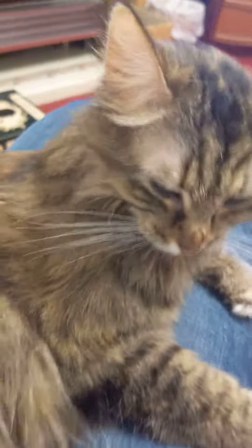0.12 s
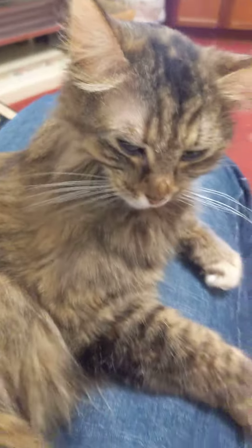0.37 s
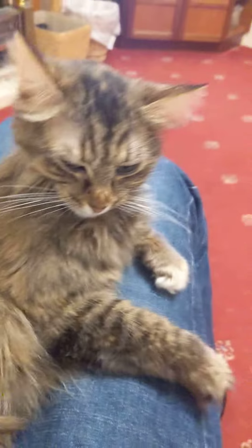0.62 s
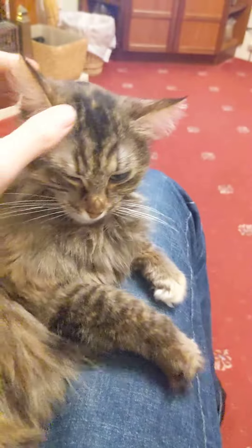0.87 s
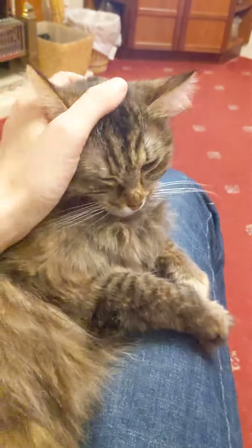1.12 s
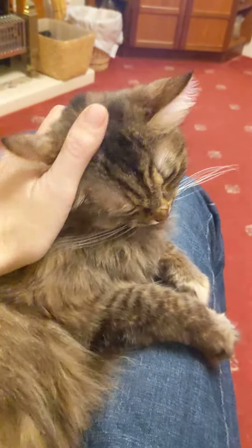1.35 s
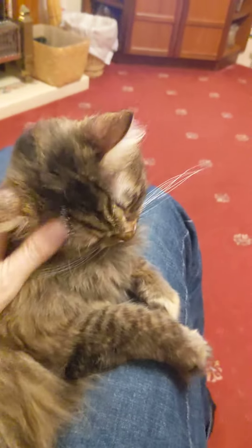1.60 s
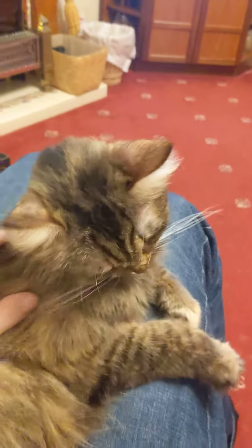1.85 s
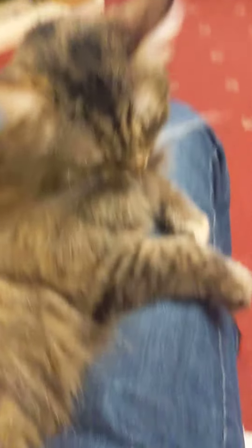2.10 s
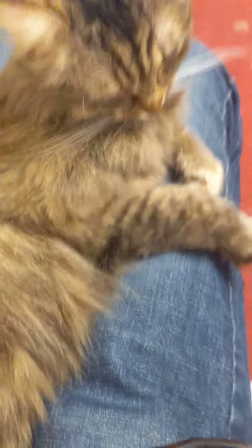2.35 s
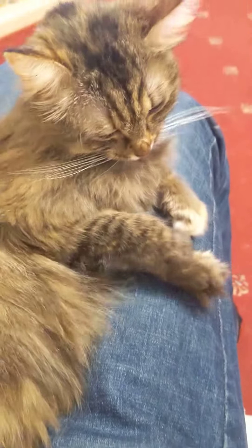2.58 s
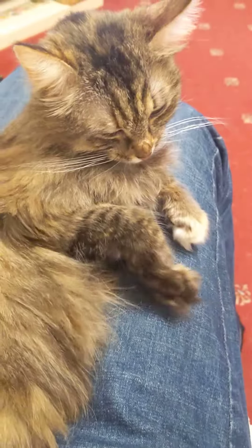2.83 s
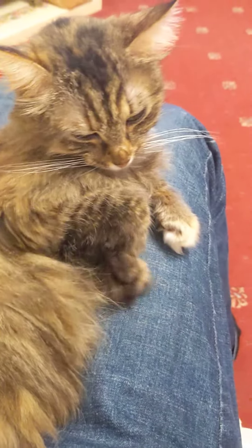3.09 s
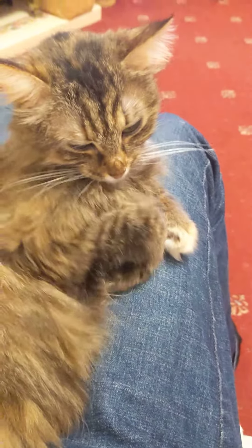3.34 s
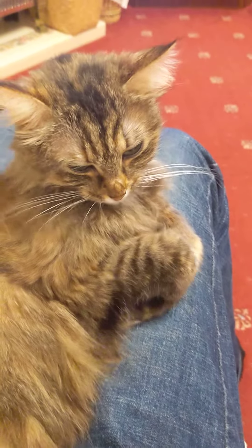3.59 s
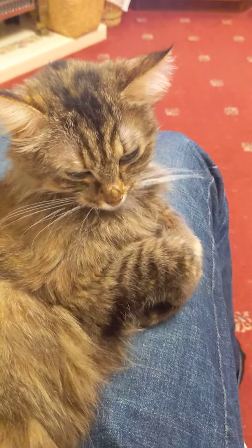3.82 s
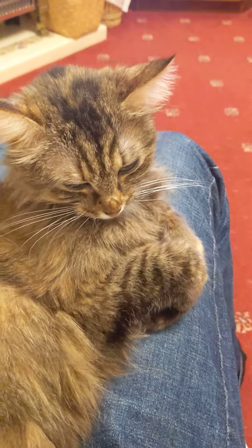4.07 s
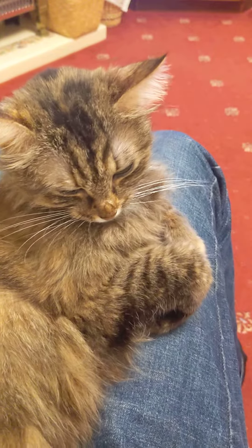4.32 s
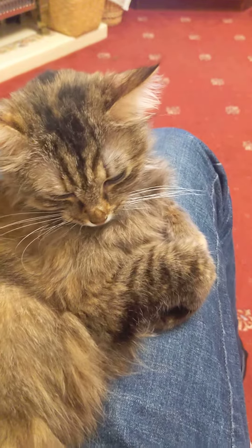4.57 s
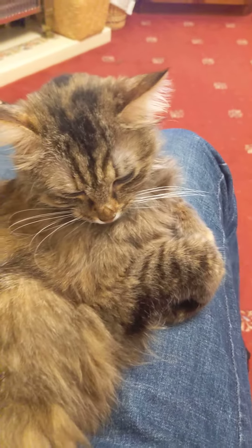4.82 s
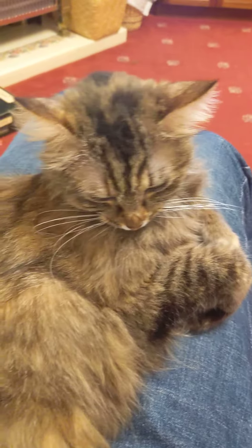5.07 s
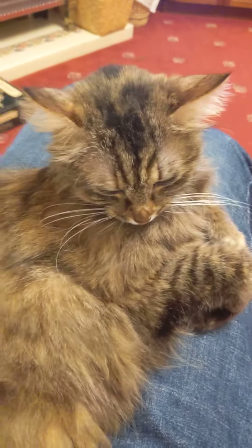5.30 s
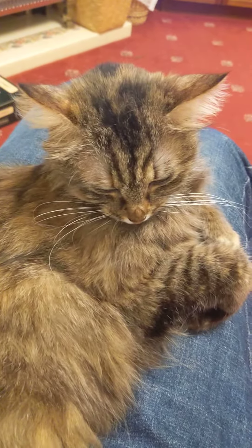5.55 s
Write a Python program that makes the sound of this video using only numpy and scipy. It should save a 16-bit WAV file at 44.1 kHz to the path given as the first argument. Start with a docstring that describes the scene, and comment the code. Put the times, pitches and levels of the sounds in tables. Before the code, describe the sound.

A low fluttering purr pulses quickly, swelling and sagging breath by breath. Around it are dry little grip ticks, soft fabric slides and an airy finger brush on the microphone at about three and a half seconds. A crisp click interrupts at two seconds; a deep, cluttered knock on the case ends the otherwise quiet, close stereo indoor scene.

```python
"""Cat purring on a lap

A cat purrs in a quiet carpeted room, an arm's length from a hand-held phone with two microphone ports.
Larynx twitches excite chest and throat resonances; skin, fur and cloth slide as noise of dense fibre slips.
The grip ticks, taps and knocks the case, once hard near the end, as noise cracks and decaying modes;
room rumble and microphone hiss, made of coloured noise, lie underneath."""
import sys
import numpy as np
from scipy import signal
from scipy.fft import rfft, irfft
from scipy.io import wavfile
from scipy.ndimage import uniform_filter1d

SR = 44100
rng = np.random.default_rng(int(sys.argv[2]) if len(sys.argv) > 2 else 0)


def bounce(signal):
    """Save signal as a 16-bit WAV file at the path given by the first command-line argument."""
    frames = np.transpose(np.atleast_2d(signal))
    limited = np.clip(frames, -1, 1)
    pcm = np.round(limited * 32767).astype(np.int16)
    wavfile.write(sys.argv[1], SR, pcm)


def gain_from_db(level_db):
    """Convert decibel levels to linear amplitude factors (20 dB per decade)."""
    decades = np.asarray(level_db, float) / 20
    return 10 ** decades


N = 250488
T = np.arange(N) / SR
SIDES = np.array([[.5], [-.5]])  # shares out a left-minus-right difference in dB

# the purr rides on each breath, out and in by turns:
# (start [s], length [s], level before the sag [dB], throat opening [dB], twitch rate [1/s])
BREATHS = [(.0, .84, -43.5,  -4, 29.036), (1.1, 1.07, -66.5, 1, 28.12), (2.1, 1.05, -55, -7, 29.6),
           (3.28, 0.9107, -62, -2.5, 27.012), (4.15, 0.95, -54.5, -6, 29.4), (5.199, .7, -64, -8, 27.72)]
SWELL_S, FADE_S, SAG_DB_PER_S, BETWEEN_DB, WAVER_DB = .2, .25, 5.5, -78.5, 2.5
FIRST_TWITCH = .51  # share of a cycle already gone at the start

# chest resonance: (frequency [Hz], width [Hz], gain [dB])
CHEST_MODES = [(190, 58, 1.5)]
# throat resonances: (frequency [Hz], width [Hz], gain [dB])
THROAT_MODES = [(269.29, 45, -5), (330.13, 93.97, -1), (430, 50, -13), (740, 110, -8), (1350, 589.3, -18)]
SNAP_S, SNAP_SCATTER_DB = .0015, 2.8
CLOSE_SHARE, CLOSE_DB = .5, -11.  # the folds clap shut later in the cycle, more softly
FLUTTER_DB, FLUTTER_RISE = -9, .15  # level of the puffs; dB gained per dB of lost effort
GARGLE_DB = -15  # uneven air bursts in the throat
RATTLE_HZ, RATTLE_DB = 3250, -22.  # nose rattle, against the throat
# wet crackle at the twitches, stronger on some
CRACKLE_HZ, CRACKLE_WIDTH_HZ, CRACKLE_DB, CRACKLE_SCATTER_DB = 1000, 1300, -22, 3
PURR_LOW_HZ = 110  # a small body radiates no deep bass
PORT_LAG_S, PURR_ROOM_DB, PURR_PAN_DB = .00033, -8., 4  # pan: left minus right

# fur and cloth slide by the left port: (start [s], fullest [s], end [s], dull centre [Hz],
# dull part [dB], bright part [dB])
SLIDES = [(-.05, 0.14, 0.27915, 2000, -70, -73), (0.7, 0.725, 0.74557, 2200, -67.5, -68),
          (1.18, 1.29, 1.42, 2100, -66.5, -78), (1.42, 1.448, 1.465, 2200, -61, -71),
          (1.54, 1.6, 1.66, 1900, -64, -72), (1.6, 1.68, 1.8045, 1700, -71, -69),
          (2.195, 2.348, 2.6612, 1700, -75.5, -72.5), (2.888, 3.0, 3.175, 1500, -63.5, -63),
          (3.283, 3.323, 3.4378, 1800, -69.5, -74), (3.801, 3.883, 4.103, 1700, -77, -70),
          (4.38, 4.47, 4.77, 1500, -70, -67), (5.108, 5.207, 5.2405, 1500, -70.5, -74),
          (5.359, 5.363, 5.3885, 1700, -56, -52), (5.43, 5.46, 5.52, 1900, -66, -72.5)]
# a finger brushes the right port: (loudest [s], rise over 20 dB [s], fall over 20 dB [s],
# dull part [dB], bright part [dB])
BRUSHES = [(.2, 0.0511, 0.0009, -75, -65), (2.714, 0.05288, 0.2772, -64.5, -59.5),
           (3.47, 0.10515, 0.0269, -62, -53.5)]
# spectrum of the dull friction noise: (frequency [Hz], relative level [dB])
DULL_SPECTRUM = [(500, -24), (930, -17), (1100, -2), (1600, 0), (2200, -5), (3000, -11.5), (5000, -27.5)]
# spectrum of the bright friction noise: (frequency [Hz], relative level [dB])
BRIGHT_SPECTRUM = [(1500, -20.5), (3000, -2.5), (5200, 2), (6500, 0), (8200, -1.5), (11000, -4.5),
                   (15900, -13)]
# humps of the dull part, each of which comes and goes: (frequency [Hz])
DULL_HUMPS_HZ = (1200, 1650, 2300)
SLIDE_PAN_DB, BRUSH_PAN_DB, SLIDE_ROUNDNESS = 16.5, -7, 0.5
RUSTLE_DULL_DB, RUSTLE_BRIGHT_DB, RUSTLE_PAN_DB = -77.5, -78.5, 13  # faint steady rustle of clothes
HUMP_WANDER_DB, SCRATCH_DB = 2.2, 2.2  # scatter of the humps and of the scratchy grain
HUMP_LOSS_DB = 14  # loss of a hump one octave from a slide's centre

# ticks and scrapes on the case: (time [s], peak level [dB], centre frequency [Hz],
# left minus right [dB], decay constant [ms])
TICKS = [(.07, -46.5, 750, 8, 1.5), (0.087, -50, 3000, 16.5, 1.2), (.156, -39, 2200, 14, 0.6),
         (0.174, -39, 2300, 0, .6), (0.187, -39, 1900, 0, .7), (.346, -48, 900, 4, 2),
         (.427, -43, 1500, 0, .5), (.563, -45, 740, 5, 1.926), (.705, -50, 2166, 17, 1.4516),
         (1.272, -50, 480, 8, 3), (1.372, -53, 600, 8, 4), (1.441, -49, 3000, 22, 6),
         (1.568, -52, 1500, 14, 5), (1.594, -33, 680, 0.5, 6), (1.597, -36, 1450, 18, 5.5),
         (1.715, -46, 2500, 13, 1.5), (2.11, -52, 700, 4, 1.5), (2.065, -24, 1500, -8, 0.8),
         (2.0648, -21.5, 5400, -17, 0.45), (2.477, -53, 1100, 4, 1.5), (2.49, -53, 750, 4, 3),
         (2.607, -47, 766.4, 0.5, 2.341), (2.914, -49, 2500, -12, 2.854), (3.03, -55, 600, 3, 2),
         (3.369, -48, 1811, 0, 1.013), (3.556, -50, 600, 3.5, 1.536), (3.826, -52, 900, 2, 1.5),
         (3.928, -47, 1300, 1, 2.223), (4.285, -40, 5851, -9.5, 0.5965), (4.987, -45, 750, 11, 3),
         (5.059, -54, 1200, 10, 4), (5.059, -52, 5462, 19.5, 2), (5.161, -50, 7480, 20, 1.062),
         (5.195, -42, 6565, 26, 0.544), (5.318, -47, 5000, 16, 0.782), (5.334, -48, 5357, 23.5, 0.772),
         (5.363, -31.5, 898.1, 18.5, 6.935), (5.371, -30, 380, 0.5, 7.003), (5.405, -46, 1600, 10, 3),
         (5.449, -37, 2400, 13, 2), (5.457, -35.5, 1800, 20, 1.5)]
# spectrum of a tick's broadband edge: (frequency [Hz], relative level [dB])
EDGE_SPECTRUM = [(1000, -6), (3000, 0), (5200, -4), (6500, 5), (7800, -5), (13000, 0), (16500, -3)]
# edge level at 2 kHz and 1 ms; higher and shorter ticks are sharper
EDGE_DB, EDGE_DB_PER_OCTAVE, EDGE_DB_PER_DOUBLING = -13, 5, -9

# knocks on the case: (time [s], blow level [dB], push length [ms], left minus right [dB],
# favoured pitch [Hz])
KNOCKS = [(1.593, -44, 1.198, 19.5, 320.4), (2.08, -46, 5, 0, 70), (2.254, -47, 1.11, 7, 220.6),
          (3.349, -47, 1.693, 9.5, 148), (3.366, -45, 2.5, 8, 130), (3.568, -53, 2.614, -5, 80),
          (3.829, -50, 5.38, -2.5, 74.95), (4.25, -47, 3.663, 0, 110), (5.363, -19.5, 1.7421, 1.5, 183.1),
          (5.365, -6.5, 3.239, 6, 71.04), (5.369, -15, 1, 3, 420), (5.374, -22, 1.5, 4, 280),
          (5.3905, -8, 3, 0, 135), (5.434, -26, 4, -6, 100), (5.458, -27, 3, 0, 155),
          (5.4808, -27, 4, 4, 115), (5.44, -40, 1, 0, 440), (5.496, -30, 4, 8, 125)]
# modes of case and hand: (frequency [Hz], 60 dB decay time [s], left gain [dB], right gain [dB])
CASE_MODES = [(58.321, 0.17647, 1, -9.5), (80, 0.087, 5.5, -0.5), (94.12, 0.0488, -4, -20),
              (132, 0.12, -7, 4), (165, 0.07, -2.5, 1), (204.08, 0.03, 1, -3.5),
              (303.03, 0.06122, -7.5, 9.5), (445, 0.0516, -3, -2)]
# spectrum of the grip's shudder at the reference pitch: (frequency [Hz], relative level [dB])
SHUDDER_SPECTRUM = [(40, -6), (120, 18), (300, -7.5), (900, -18.5), (1500, -59)]
SPOT_DB = 36.  # loss of a mode one octave from the favoured pitch
OPPOSED_HZ = 280  # higher modes bend the case, so the ports move against each other
SHUDDER_DB, SHUDDER_T60_S = -27.5, 0.5  # decay time at the reference pitch and below
SHUDDER_SPOT_HZ = 110  # reference pitch

# springy taps whose pitch sags as the grip settles: (time [s], level [dB], first pitch [Hz],
# settled pitch [Hz], left minus right [dB])
TAPS = [(2.0652, -26.5, 280, 122, 5), (2.134, -46, 280, 140, 8), (4.986, -47, 330, 160, 6),
        (1.592, -44, 450, 250, 10), (3.927, -48, 450, 200, 3)]
TAP_RISE_S, TAP_SAG_S, TAP_T60_S = .004, .011, .1

# spectrum of room and microphone noise: (frequency [Hz], left port [dB], right port [dB])
FLOOR_SPECTRUM = [(25, -25, -22), (46.85, -5, -5), (121.67, 4.5, 0.5), (200.43, 5, -4), (330, -4, -9.5),
                  (600, -14, -10), (1300, -32.5, -17.5), (2500, -22, -17.5), (5000, -19, -21.5),
                  (7078, -22.5, -27.5), (9500, -24, -34), (12211, -23.5, -21), (15900, -26, -23)]
FLOOR_DB, SHARED_BASS_HZ = -62.5, 300.
# narrow hiss bands: (frequency [Hz], width [Hz], left level [dB], right level [dB])
HISS_BANDS = [(13824, 150, -91, -79), (14664, 150, -92, -80)]


def to_rms(x, db):
    """Normalisation: scale to an rms level."""
    return x * gain_from_db(db) / np.sqrt(np.mean(x ** 2))


def colour(x, points):
    """Linear filtering: multiply the spectrum by (frequency [Hz], level [dB]) points."""
    hz, db = np.transpose(points)
    f = np.maximum(np.fft.rfftfreq(x.shape[-1], 1 / SR), 1)
    gain = gain_from_db(np.interp(np.log(f), np.log(hz), db))
    return irfft(rfft(x) * gain, x.shape[-1])


def ring(x, hz, width):
    """Resonance: a second-order peak of gain 1 at its centre."""
    return signal.lfilter(*signal.iirpeak(hz, hz / width, fs=SR), x)


def walk(rate):
    """Slow fluctuation: random levels drawn rate times a second, joined by slopes; spread near 1."""
    k = int(SR / rate)
    steps = np.repeat(rng.standard_normal(N // k + 1), k)
    return uniform_filter1d(steps, k)[:N]


def purr():
    """Source and filter: fold snaps and puffs of air excite chest and throat; the room smears them."""
    db, open_db, rate = breathing()
    phase = FIRST_TWITCH + np.cumsum(rate) / SR
    at = np.flatnonzero(np.diff(np.floor(phase)))
    chance = rng.standard_normal((len(at), 5))

    # each twitch snaps the folds apart, and they clap shut with the opposite sign
    opening = at + (.002 * SR * chance[:, 0]).astype(int)
    closing = at + ((CLOSE_SHARE + .08 * chance[:, 2]) * SR / rate[at]).astype(int)
    snaps = np.zeros(N)
    snaps[np.clip(opening, 0, N - 1)] = -gain_from_db(SNAP_SCATTER_DB * chance[:, 1])
    snaps[np.clip(closing, 0, N - 1)] = gain_from_db(CLOSE_DB + SNAP_SCATTER_DB * chance[:, 3])
    # soft folds close in about a millisecond
    snaps = np.convolve(snaps, np.hanning(int(SNAP_S * SR)), "same")
    puffs = np.exp(-(phase % 1) / 1.0786) * gain_from_db(1.318 * walk(34)) * rng.standard_normal(N)
    # put both on an equal footing at the chest resonance
    snaps, puffs = (v / np.std(ring(v, *CHEST_MODES[0][:2])) for v in (snaps, puffs))
    # a weak purr is more breath than snap
    weakness_db = FLUTTER_RISE * (db.max() - db)
    drive = snaps + gain_from_db(FLUTTER_DB + weakness_db) * puffs

    # the chest wall is heavy: it swings up over a cycle or two
    chest = sum(gain_from_db(g) * ring(ring(drive, hz, w), hz, 2.6296 * w) for hz, w, g in CHEST_MODES)
    gargle = drive + gain_from_db(GARGLE_DB + 5. * walk(90)) * puffs
    throat = sum(gain_from_db(g) * ring(gargle, hz, w) for hz, w, g in THROAT_MODES)
    rattle = ring(np.exp(-(phase % 1) / 0.04) * puffs, RATTLE_HZ, 350)
    throat = throat + to_rms(rattle, RATTLE_DB) * np.std(throat)
    wet = np.zeros(N)
    wet[at] = gain_from_db(CRACKLE_SCATTER_DB * np.abs(chance[:, 4]) ** 1.5)
    crackle = ring(ring(wet, CRACKLE_HZ, CRACKLE_WIDTH_HZ), CRACKLE_HZ, CRACKLE_WIDTH_HZ)
    throat = throat + to_rms(crackle, CRACKLE_DB) * np.std(throat) * gain_from_db(weakness_db)

    body = chest + gain_from_db(open_db + 3. * walk(28)) * throat
    voice = gain_from_db(db) * body / np.std(chest + throat)
    voice = signal.lfilter(*signal.butter(2, PURR_LOW_HZ, "high", fs=SR), voice)
    # diffuse reverberation decays 60 dB in 0.5184 s
    tail = rng.standard_normal((2, SR // 4)) * gain_from_db(-60 * T[:SR // 4] / 0.5184)
    room = signal.fftconvolve(voice[None], tail / np.linalg.norm(tail[0]), axes=1)[:, :N]
    direct = np.array([voice, np.interp(T - PORT_LAG_S, T, voice)])
    return (direct + gain_from_db(PURR_ROOM_DB) * room) * gain_from_db(PURR_PAN_DB * SIDES)


def breathing():
    """Amplitude modulation: each breath swells, sags and fades; gives level, opening and twitch rate."""
    start, length, db, open_db, rate = np.transpose(BREATHS)
    age = T - start[:, None]
    swell = np.clip(age / SWELL_S, 0, 1)
    fade = np.clip((length[:, None] - age) / FADE_S, 0, 1)
    breaths = swell * fade * gain_from_db(db[:, None] - SAG_DB_PER_S * age)
    gain = gain_from_db(BETWEEN_DB) + breaths.sum(axis=0)
    now = np.maximum(np.searchsorted(start, T) - 1, 0)
    return 20 * np.log10(gain) + WAVER_DB * walk(7), open_db[now], rate[now]


def rubbing():
    """Friction noise: dense uneven fibre slips, unrelated at the ports; slides swell, brushes spike."""
    humps = np.array(DULL_HUMPS_HZ)

    def parts(dull_db, bright_db):
        """Superposition: one level per dull hump, then the bright level."""
        return np.append(dull_db + 0 * humps, bright_db)[:, None, None]

    rustle_db = parts(RUSTLE_DULL_DB, RUSTLE_BRIGHT_DB) + RUSTLE_PAN_DB * SIDES
    gains = gain_from_db(rustle_db) * np.ones(N)
    for start, full, end, hz, dull_db, bright_db in SLIDES:
        rise_fall = np.interp(T, [start, full, end], [0, 1, 0])
        shape = np.sin(np.pi / 2 * rise_fall) ** SLIDE_ROUNDNESS
        hump_db = dull_db - HUMP_LOSS_DB * np.log2(humps / hz) ** 2
        slide = shape * gain_from_db(parts(hump_db, bright_db) + SLIDE_PAN_DB * SIDES)
        gains = np.hypot(gains, slide)  # unrelated noises add in power
    for loudest, rise, fall, *db in BRUSHES:
        shape_db = -20 * np.maximum((loudest - T) / rise, (T - loudest) / fall)
        gains = np.hypot(gains, gain_from_db(shape_db + parts(*db) + BRUSH_PAN_DB * SIDES))

    slips = [rng.standard_normal((2, N)) * gain_from_db(2.2286 * rng.exponential(size=(2, N))) for _ in range(2)]
    scratchy = colour(slips[0] * gain_from_db(SCRATCH_DB * walk(300)), DULL_SPECTRUM)
    dull = np.array([gain_from_db(HUMP_WANDER_DB * walk(30)) * ring(scratchy, hz, hz / 3) for hz in humps])
    dull = to_rms(dull, -5)
    bright = gain_from_db(0.5864 * walk(40)) * to_rms(colour(slips[1], BRIGHT_SPECTRUM), 0)
    return (gains[:-1] * dull).sum(axis=0) + gains[-1] * bright


def ticks():
    """Impulsive excitation: a short noisy crack through a steep resonance, with a broadband edge."""
    out, t = np.zeros((2, N + 2048)), T[:2048]
    noises = rng.standard_normal((len(TICKS), 2, 2048))
    for (s, db, hz, pan_db, ms), noise in zip(TICKS, noises):
        u = 1000 * t / max(ms, .2)
        burst = (noise + .6 * noise[0]) * u ** .4 * np.exp(-u)  # partly alike at both ports
        edge_db = EDGE_DB + EDGE_DB_PER_OCTAVE * np.log2(hz / 2000) + EDGE_DB_PER_DOUBLING * np.log2(ms)
        resonant = ring(ring(burst, hz, 0.95 * hz), hz, 0.95 * hz)
        edge = colour(burst * np.exp(-u), EDGE_SPECTRUM)
        crack = to_rms(resonant, 0) + to_rms(edge, edge_db)
        i = int(s * SR)
        out[:, i:i + 2048] += crack / np.abs(crack).max() * gain_from_db(db + pan_db * SIDES)
    return out[:, :N]


def knocks():
    """Modal excitation: a rounded push rings modes near the favoured pitch; the grip shudders after."""
    out, t = np.zeros((2, N + SR // 2)), T[:SR // 2]
    noises = rng.standard_normal((len(KNOCKS), 2, len(t)))
    for (s, db, ms, pan_db, spot_hz), noise in zip(KNOCKS, noises):
        push = np.sin(np.pi * np.clip(1000 * t / ms, 0, 1)) ** 2 / (ms * SR / 2000)
        # the shudder's colour moves with the favoured pitch; above the reference it is shorter
        spectrum = np.array(SHUDDER_SPECTRUM) * [spot_hz / SHUDDER_SPOT_HZ, 1]
        shudder_t60 = SHUDDER_T60_S * min(SHUDDER_SPOT_HZ / spot_hz, 1) ** 2
        shudder = to_rms(colour(noise, spectrum), SHUDDER_DB)
        knock = shudder * gain_from_db(-60 * t / shudder_t60) * np.minimum(t / 0.00516, 1)
        for hz, t60, left_db, right_db in CASE_MODES:
            pole = np.exp(2j * np.pi * hz / SR - np.log(1000) / (t60 * SR))
            gain = gain_from_db(np.array([[left_db], [right_db]]) - SPOT_DB * np.log2(hz / spot_hz) ** 2)
            gain = gain * [[1], [np.sign(OPPOSED_HZ - hz)]]
            knock = knock + gain * signal.lfilter([1], [1, -pole], push).imag
        # a light tap barely shifts the whole hand
        knock = signal.lfilter(*signal.butter(2, .55 * spot_hz, "high", fs=SR), knock)
        i = int(s * SR)
        out[:, i:i + len(t)] += gain_from_db(db + pan_db * SIDES) * knock
    return out[:, :N]


def taps():
    """Relaxing stiffness: a decaying ring starts stiff and high, then slackens in pitch."""
    out, t = np.zeros((2, N + SR // 4)), T[:SR // 4]
    for s, db, first_hz, end_hz, pan_db in TAPS:
        hz = end_hz + (first_hz - end_hz) * np.exp(-t / TAP_SAG_S)
        envelope = np.minimum(t / TAP_RISE_S, 1) * gain_from_db(-60 * t / TAP_T60_S)
        tap = np.sin(2 * np.pi * np.cumsum(hz) / SR) * envelope
        i = int(s * SR)
        out[:, i:i + len(t)] += gain_from_db(db + pan_db * SIDES) * tap
    return out[:, :N]


def noise_floor():
    """Partial coherence: rumble shared by the ports, hiss of each port's own, narrow bands up high."""
    own, shared = rng.standard_normal((2, N)), rng.standard_normal(N)
    low, high = (signal.butter(2, SHARED_BASS_HZ, kind, fs=SR) for kind in ("low", "high"))
    rumble = signal.lfilter(*low, 0.9805 * shared + 0.7705 * own) * gain_from_db(2 * walk(6.7))
    noise = rumble + signal.lfilter(*high, own)
    rows = np.array(FLOOR_SPECTRUM)
    out = np.array([colour(noise[k], rows[:, [0, k + 1]]) for k in range(2)])
    out = to_rms(out, FLOOR_DB)
    for hz, width, left_db, right_db in HISS_BANDS:
        out = out + gain_from_db(np.array([[left_db], [right_db]])) * to_rms(ring(own, hz, width), 0)
    return out


def scene():
    """Superposition: the pressures of all sources add at the two ports."""
    return purr() + rubbing() + ticks() + knocks() + taps() + noise_floor()


def top_cut(x):
    """Nothing passes above the cut-off."""
    return signal.sosfilt(signal.butter(12, 15900, fs=SR, output="sos"), x)


def record(dry):
    """High-pass filtering: the phone cuts the deepest bass, below 48 Hz."""
    bass_cut = signal.butter(3, 48, "high", fs=SR, output="sos")
    mix = signal.sosfilt(bass_cut, dry)
    return top_cut(mix)


dry = scene()
out = record(dry)
bounce(out)
```